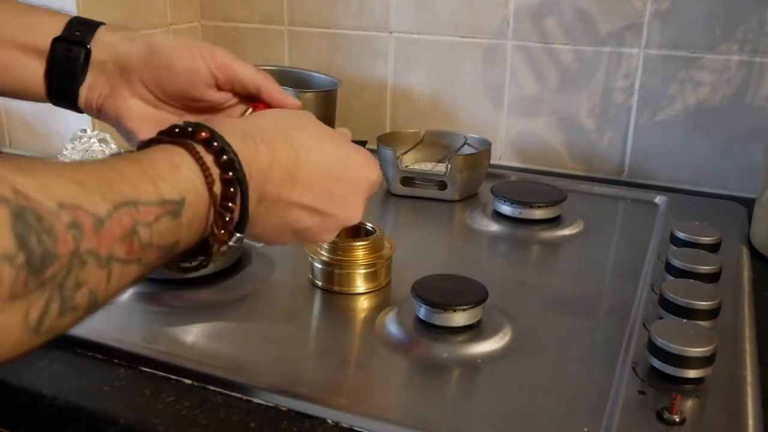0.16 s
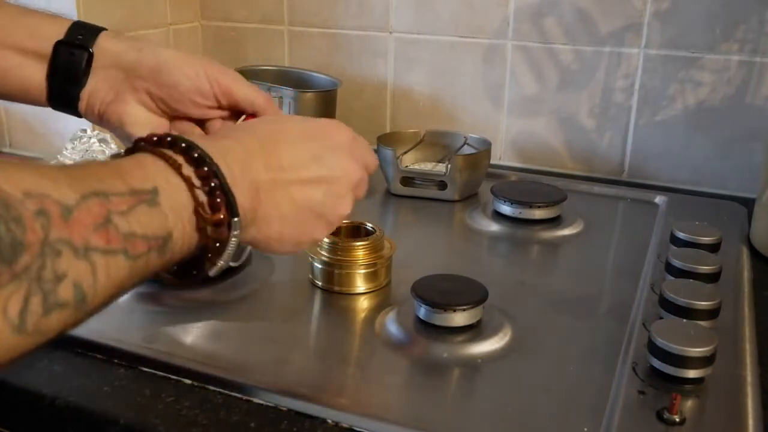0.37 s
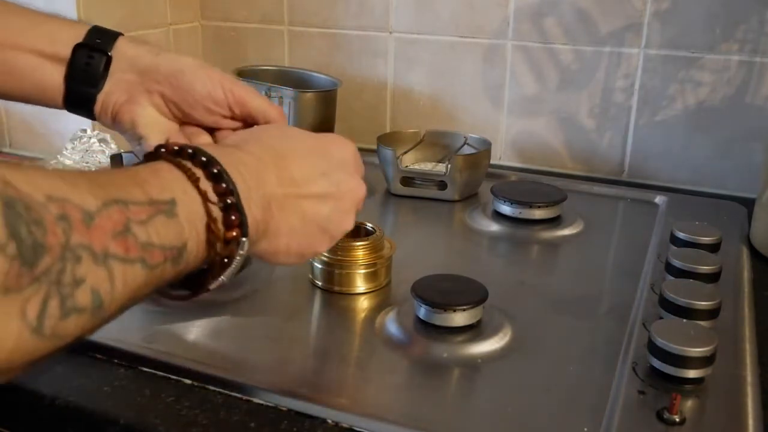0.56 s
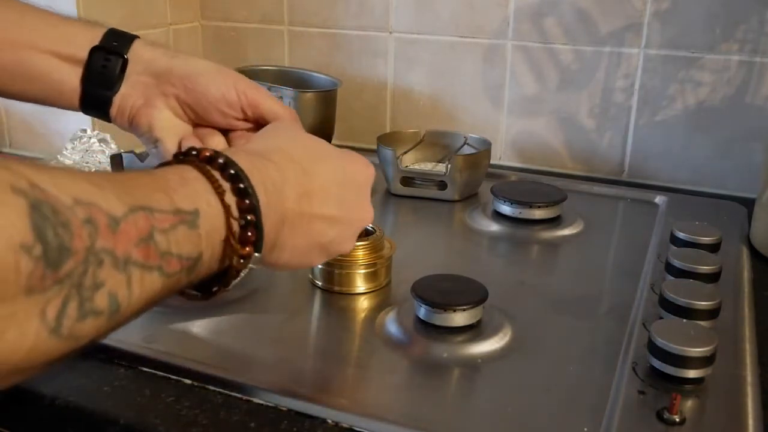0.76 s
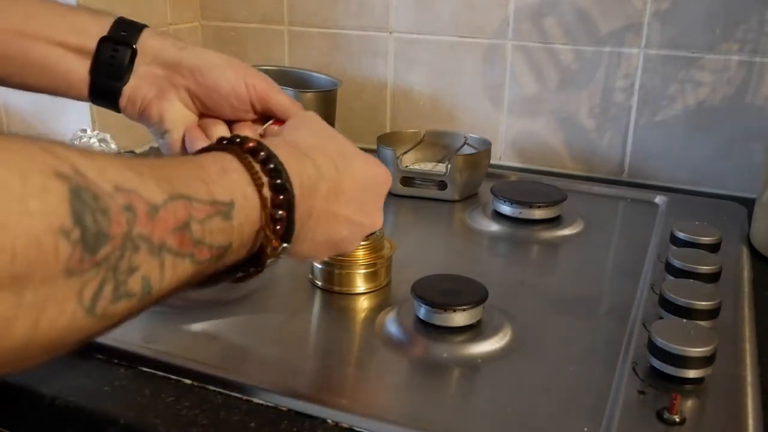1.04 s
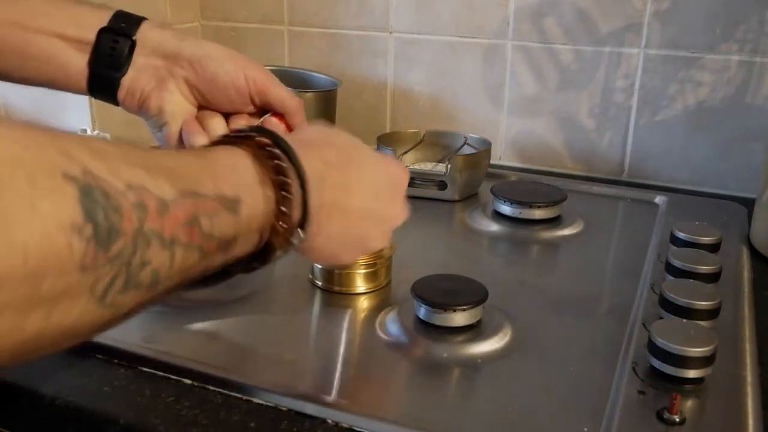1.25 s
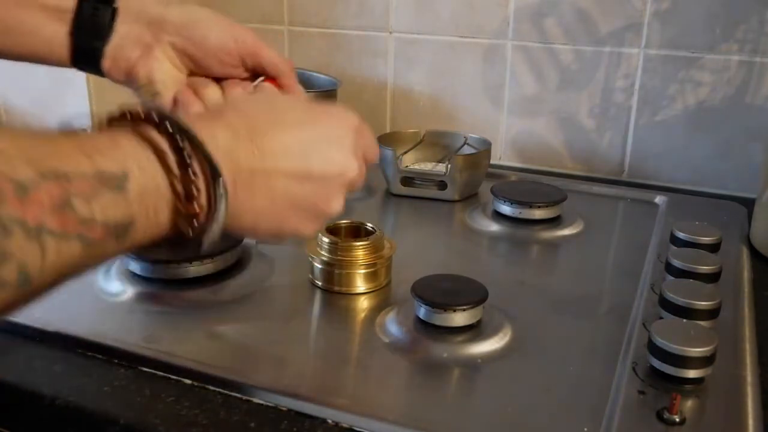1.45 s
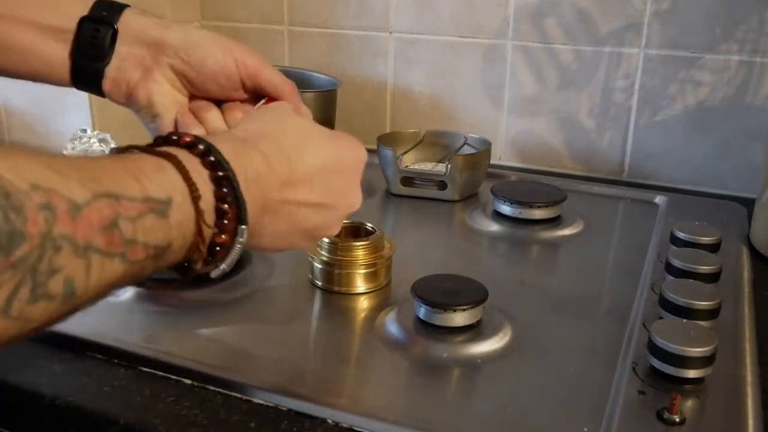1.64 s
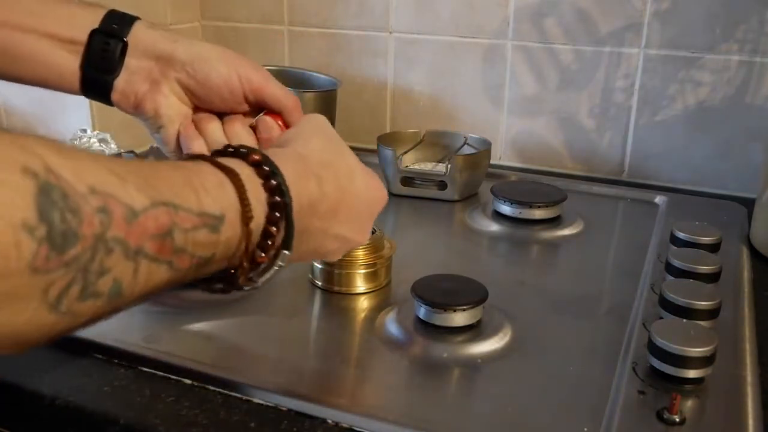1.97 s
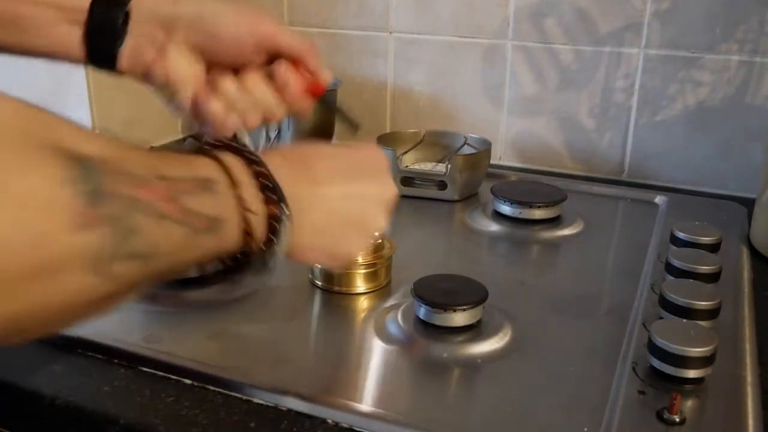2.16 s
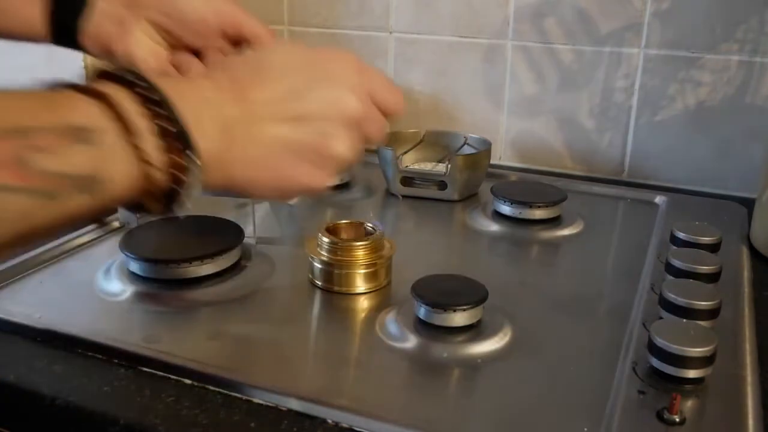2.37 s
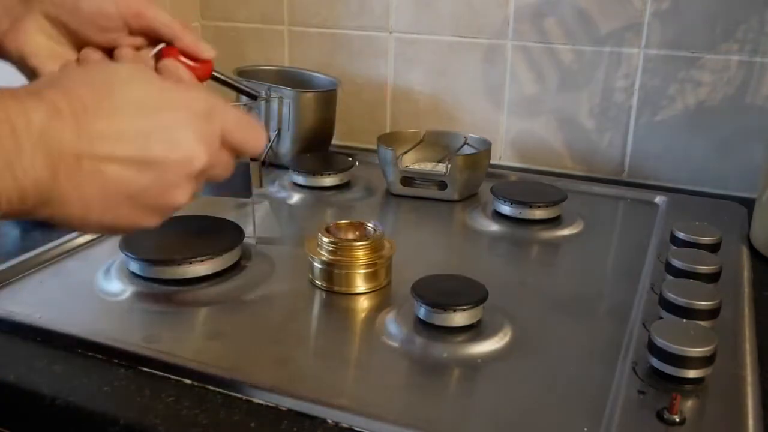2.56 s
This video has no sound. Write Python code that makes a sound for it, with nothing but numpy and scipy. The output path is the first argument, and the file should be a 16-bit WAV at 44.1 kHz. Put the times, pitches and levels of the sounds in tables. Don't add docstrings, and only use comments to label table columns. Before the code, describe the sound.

A steel striker scrapes a fire rod close to the microphone: a dull first try, a brighter quick scrape with clicks and pops, then the loudest stroke with a fizzing spark flare, in a small tiled kitchen.

```python
import sys
import numpy as np
from scipy import signal
from scipy.fft import rfft, irfft
from scipy.io import wavfile
from scipy.ndimage import uniform_filter1d, minimum_filter1d

SR = 44100
rng = np.random.default_rng(int(sys.argv[2]) if len(sys.argv) > 2 else 0)


def decibels_to_gain(level_db):
    exponent = np.asarray(level_db, float) / 20
    return 10 ** exponent


def wav_record(signal):
    frames = np.transpose(np.atleast_2d(signal))
    bounded = np.clip(frames, -1, 1)
    quanta = np.round(bounded * 32767).astype(np.int16)
    wavfile.write(sys.argv[1], SR, quanta)


N = 119070


def rms_one(x):
    return x / np.sqrt(np.mean(x ** 2) + 1e-20)


def at_hz(points, hz):
    freqs, values = np.transpose(points)
    return np.interp(np.log(hz + 1), np.log(freqs), values)


def colour(x, spectrum):
    hz = np.arange(N // 2 + 1) * SR / N + 1
    low_end = np.minimum(1, (hz / spectrum[0][0]) ** 2)
    high_end = np.minimum(1, (spectrum[-1][0] / hz) ** 2)
    return rms_one(irfft(rfft(x) * decibels_to_gain(at_hz(spectrum, hz)) * low_end * high_end, N))


def band_pass(x, order, low_hz, high_hz):
    return signal.sosfilt(signal.butter(order, [low_hz, high_hz], "band", fs=SR, output="sos"), x)


def drift(rate_hz):
    r = np.exp(-2 * np.pi * rate_hz / SR)
    wander = signal.lfilter([1], [1, -2 * r, r * r], rng.standard_normal(N + SR))
    return rms_one(wander[SR:])


def held(start, end, rise, t60):
    t = np.arange(N) / SR
    return np.clip((t - start) / rise, 0, 1) * decibels_to_gain(-60 * np.maximum(t - end, 0) / max(t60, .003))


def ring(clicks, hz, t60):
    r = decibels_to_gain(-60 / (t60 * SR))
    w = 2 * np.pi * hz / SR
    return signal.lfilter([0, np.sin(w)], [1, -2 * r * np.cos(w), r * r], clicks + 1e-18)


def clicks_at(s, gain):
    out = np.zeros(N)
    np.add.at(out, np.minimum((np.asarray(s) * SR).astype(int), N - 1), gain)
    return out


def grains(per_s, spread_db):
    sizes = decibels_to_gain(spread_db * np.minimum(rng.exponential(1, N), 4)) * rng.choice([-1, 1], N)
    return sizes * (rng.random(N) < per_s / SR)


def self_noise():
    # f/Hz, level/dB per Hz
    hiss_spectrum = [(60, 1), (300, 7), (1500, 1.5), (15300, 5), (16200, -21)]
    return decibels_to_gain(-73.5) * colour(rng.standard_normal(N), hiss_spectrum)


def room_tone():
    # f/Hz, level/dB per Hz
    air_spectrum = [(380, -16), (470, -5.5), (700, -6), (1400, -12), (2700, -16), (6000, -22),
                    (15300, -27.5), (16200, -44)]
    return decibels_to_gain(-62) * colour(rng.standard_normal(N), air_spectrum)


def rumble():
    # f/Hz, level/dB per Hz
    rumble_spectrum = [(12, -6), (20, 2), (32, -19), (76, 0), (97, 0.5), (114, -20.5), (211, -4.5),
                       (275, -13), (320, -20), (420, -14), (700, -120)]
    return decibels_to_gain(-50 + 1.8 * drift(1.34)) * colour(rng.standard_normal(N), rumble_spectrum)


def kitchen(x):
    # f/Hz, t60/s
    kitchen_decay = [(300, 0.6), (1200, 0.32), (2600, 0.45), (6000, 0.51), (10000, 0.23), (15000, 0.29)]
    first_echo_s = 0.003
    t, echoes = np.arange(SR) / SR, 0
    edges = 150 * 2 ** np.arange(0, 7.1, .5)
    white = rng.standard_normal((2, SR))
    for k, (low_hz, high_hz) in enumerate(zip(edges, edges[1:])):
        t60 = at_hz(kitchen_decay, np.sqrt(low_hz * high_hz))
        echoes = echoes + band_pass(white[k % 2], 2, low_hz, high_hz) * decibels_to_gain(-60 * t / t60)
    echoes = echoes * np.clip(t / first_echo_s - .5, 0, 1)
    return signal.fftconvolve(x, echoes / np.sqrt(np.sum(echoes ** 2)))[:N]


def thumps():
    # t/s, level/dB, f/Hz, t60/s
    hob_thumps = [
        (1.209, -32, 39.6, 0.75),
        (1.25, -35.5, 38, .25),
        (2.113, -26, 66, 0.073),
        (2.198, -30, 72, 0.41),
        (2.237, -17, 554, 0.036),
        (0.299, -51.5, 1480, 0.11),
    ]
    out = 0
    for s, db, hz, t60 in hob_thumps:
        contact = ring(clicks_at([s], decibels_to_gain(db) * 6.0 * hz / SR), hz, 1.22 / hz)
        out = out + ring(contact, hz, t60)
    return out


def flare():
    # t/s, level/dB, t60/s; the first lends the knock at 1.24 s a low, lingering body, the
    roar_puffs = [(1.246, -29.5, 0.14), (2.12, -31, 0.064), (2.133, -30, 0.071), (2.1378, -23.5, 0.05),
                  (2.183, -21, 0.035), (2.2028, -19.5, 0.018), (2.211, -30, 0.082), (2.2335, -31, 0.013),
                  (2.2375, -22, 0.053), (2.251, -48, 0.033), (2.396, -47.5, 0.16)]
    # f/Hz, level/dB per Hz
    roar_spectrum = [(150, -5.5), (300, -11), (570, -3), (800, -4), (1030, -2.5), (1300, -9.5), (1700, -5),
                     (4200, -13)]
    # f/Hz, level/dB per Hz
    sizzle_spectrum = [(3500, 7), (5000, 0), (8500, 4), (11000, -5), (15500, -21)]
    shower = held(2.12, 2.255, 0.0077, 0.07)
    roar_gain = decibels_to_gain(-48.5) * shower
    for s, db, t60 in roar_puffs:
        roar_gain = roar_gain + decibels_to_gain(db) * held(s, s, 0.0028, t60)
    lumps = decibels_to_gain(1.5 * drift(150))
    roar = rms_one(lumps * colour(grains(6000, spread_db=2), roar_spectrum))
    sizzle_gain = decibels_to_gain(-40.5 + 2 * drift(60)) * shower
    sizzle = colour(grains(4000, spread_db=2), sizzle_spectrum)
    return roar_gain * roar + sizzle_gain * sizzle


def sparks():
    # t/s, peak/dB, fizz/dB re peak, fizz t60/s, body/dB re peak
    spark_bursts = [(0.4324, -37, -6.5, 0.061, -1), (1.28, -26, -23, 0.027, -18),
                    (1.2989, -17, -30, .03, -24), (1.4316, -19.5, -5.5, 0.051, -8.5),
                    (1.438, -29, -6.5, .05, -8), (1.4764, -20.5, -18, 0.027, -20),
                    (1.481, -22.5, -25, 0.026, -5.5), (2.1577, -13, 0, 0.017, -16),
                    (2.17, -9.5, -14, 0.025, -23), (2.183, -41, -11, 0.053, -20),
                    (2.2122, -20.5, 2.5, 0.1, -18), (2.263, -24, -13, .02, -14),
                    (2.268, -11.5, -6.5, 0.027, -22), (2.273, -18, -28, .03, -10),
                    (2.3362, -21, -9.5, 0.034, -11), (2.465, -34.5, -5, 0.17, 0.5),
                    (2.5015, -20, -13, .02, -14), (2.5058, -19.5, -15, .04, -6),
                    (2.6774, -48, -1, 0.039, 5)]
    fizz_noise = grains(6000, spread_db=3.5) / 1.05
    bright, body = 0, 0
    for s, db, fizz_db, t60, body_db in spark_bursts:
        click = 3.18 * clicks_at([s], 0.95)
        fizz = fizz_noise * decibels_to_gain(fizz_db) * held(s, s, 1e-4, t60)
        burst = decibels_to_gain(db) * (click + fizz)
        bright = bright + burst
        body = body + decibels_to_gain(body_db) * burst
    return band_pass(bright, 3, 7340, 13600) + band_pass(body, 3, 1030, 7300)


def knocks():
    # t/s, peak/dB, hard crack/dB re peak
    rod_knocks = [(0.487, -23.5, -11.5), (0.518, -48, -30), (0.5844, -33.5, -9.5), (0.643, -23.5, -12),
                  (0.6667, -21.5, -12.5), (0.6709, -24.5, -35), (0.6727, -29, -7.5), (0.704, -58, -28),
                  (1.2435, -10.5, -9.5), (1.3402, -11, 3), (1.6124, -19.5, 1.5), (2.1171, -6.5, -11),
                  (2.397, -55, -15), (2.5257, -54, 0), (2.6108, -50, 3)]
    # f/Hz, level/dB, t60/s
    knock_modes = [(2460, 3, .013), (2720, 2, .013), (1650, -13, .006), (3700, -14, .005)]
    # f/Hz, level/dB, t60/s
    crack_modes = [(4100, -2, .006), (5100, -1, .004), (5800, 0, .005), (7200, 0, .003), (8600, -5, .0025),
                   (10200, -5, .002), (12500, -10, .0015)]
    rebounds = [(0.0028, -5), (.0058, -2)]  # delay/s, level/dB re first hit
    rebound_spread = 0.19
    hard_at_hz = 6000
    s, db, crack_db = np.transpose(rod_knocks)

    clatter_gain = sum(decibels_to_gain(hit_db - 2) * held(t, t, 1e-4, 0.025) for t, hit_db in zip(s, db + crack_db))
    out = band_pass(grains(6000, spread_db=4.5) * clatter_gain, 2, 2800, 9500)
    for k, (hz, mode_db, t60) in enumerate(knock_modes):
        hit_db = db - 5.5 + mode_db + rng.normal(0, 0.67, len(s))
        out = out + (-1) ** k * ring(clicks_at(s, decibels_to_gain(hit_db)), hz, t60)
    for k, (hz, mode_db, t60) in enumerate(crack_modes):
        hit_db = db + crack_db * max(1, hz / hard_at_hz) - 5.5 + mode_db
        train = clicks_at(s, decibels_to_gain(hit_db + rng.normal(0, 2, len(s))))
        for delay_s, rebound_db in rebounds:
            late = delay_s * (1 + rebound_spread * np.tanh(rng.normal(0, 1, len(s))))
            train = train + clicks_at(s + late, decibels_to_gain(hit_db + rebound_db + rng.normal(0, 2, len(s))))
        out = out + (-1) ** k * ring(train, hz, t60)
    return band_pass(out, 2, 1285, 14000)


def strokes():
    # start/s, end/s, ring/dB, hiss/dB, swell/dB
    rod_strokes = [
        (.612, 0.67, -41, -58, 7),
        (1.205, 1.244, -38, -28.5, 7.5),
        (2.0823, 2.122, -37, -26, 17.5),
    ]
    # f/Hz, width/Hz, level/dB
    rod_modes = [(2306, 170, -8.5), (2640, 280, 8.5), (3780, 360, -4.5), (5930, 800, -5.5),
                 (1750, 1200, -20.5), (7600, 1000, -14.5)]
    # f/Hz, level/dB per Hz
    hiss_spectrum = [(3500, -25), (5000, -10), (6100, -1.5), (8300, -4), (11500, -8.5), (14500, -11),
                     (15800, -44)]
    bite_s, let_go_t60_s = 0.0033, .05
    slips = grains(2500, spread_db=3)
    rod = 0
    for k, (hz, width, db) in enumerate(rod_modes):
        mode = ring(slips, hz, np.log(1000) / np.pi / width)
        rod = rod + decibels_to_gain(db) * (-1) ** k * rms_one(mode)
    rod = rms_one(rod) * decibels_to_gain(3.5 * drift(120))
    hiss = colour(grains(8200, spread_db=2), hiss_spectrum) * decibels_to_gain(2 * drift(110))
    t, out = np.arange(N) / SR, 0
    for start, end, ring_db, hiss_db, swell_db in rod_strokes:
        full_speed = .4 * start + .6 * end
        swell = decibels_to_gain(np.interp(t, [start, full_speed], [-swell_db, 0]))
        rasp = decibels_to_gain(ring_db) * rod + decibels_to_gain(hiss_db) * swell * hiss
        out = out + held(start, end, bite_s, let_go_t60_s) * rasp
    return out


def scene():
    near = strokes() + knocks() + sparks() + flare()
    mid = near + decibels_to_gain(-7.5) * kitchen(near) + thumps() + room_tone() + rumble()
    side = self_noise() + decibels_to_gain(-41.5) * kitchen(near)
    return np.array([mid + side, mid - side])


def low_pass(x):
    return signal.sosfilt(signal.butter(12, 16810, fs=SR, output="sos"), x)


def record(dry):
    look_ahead_s, duck_share, margin_db, most_db = .012, .5, 15, 8
    bright = np.diff(dry.mean(axis=0), prepend=0)
    level_db = 10 * np.log10(uniform_filter1d(bright ** 2, 130) + 1e-12)
    ahead = int(look_ahead_s * SR)
    coming_db = -minimum_filter1d(-level_db, ahead, origin=-(ahead // 2))
    before_db = -minimum_filter1d(-level_db, 400, origin=199)
    duck_db = np.clip(duck_share * (coming_db - before_db - margin_db), 0, most_db)
    low = signal.sosfiltfilt(signal.butter(2, 1500, fs=SR, output="sos"), dry)
    ducked = low + (dry - low) * decibels_to_gain(-uniform_filter1d(duck_db, size=60))
    band_end = signal.cheby2(10, 32, 16200, fs=SR, output="sos")
    return low_pass(signal.sosfilt(band_end, ducked))


dry = scene()
out = record(dry)
wav_record(out)
```